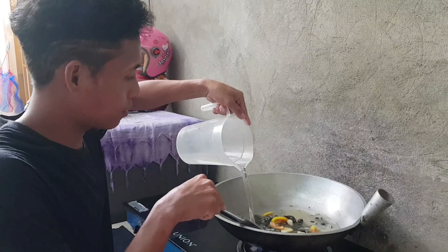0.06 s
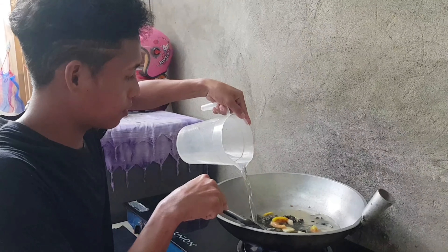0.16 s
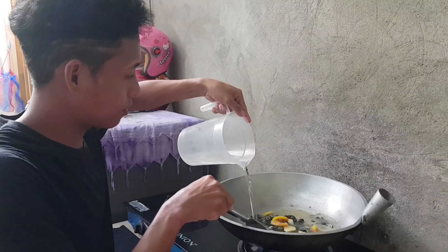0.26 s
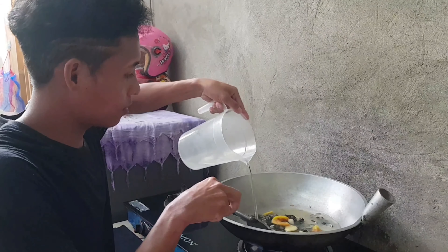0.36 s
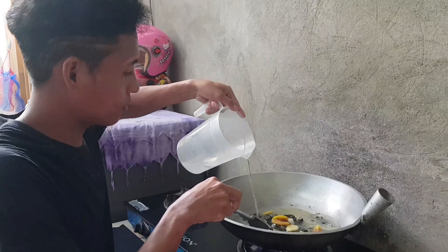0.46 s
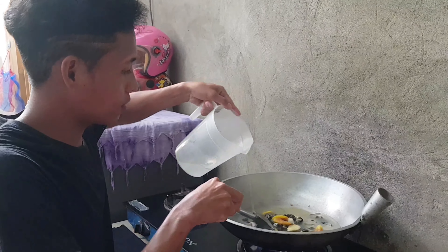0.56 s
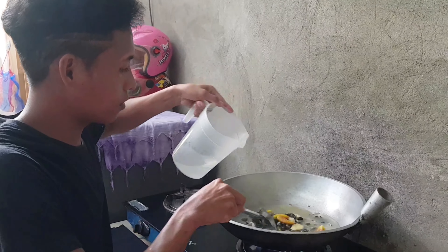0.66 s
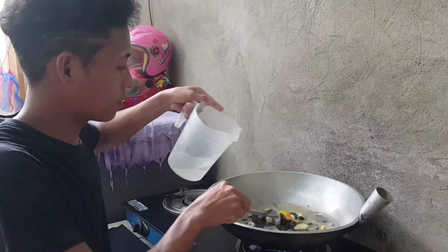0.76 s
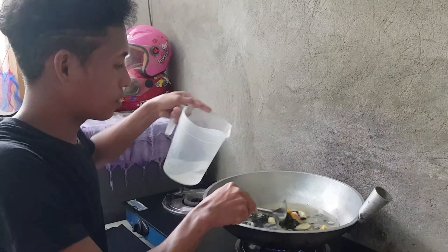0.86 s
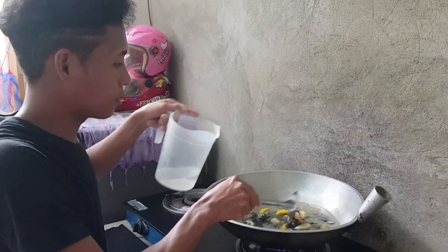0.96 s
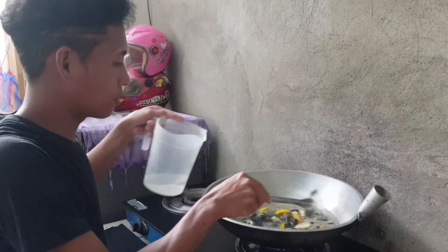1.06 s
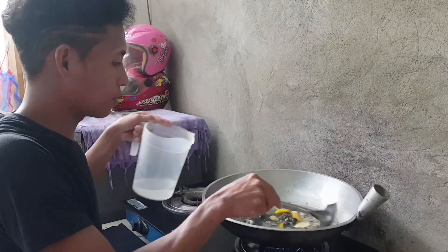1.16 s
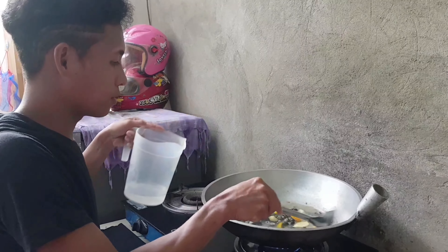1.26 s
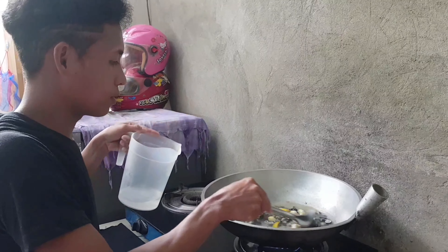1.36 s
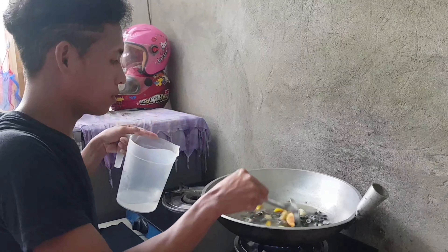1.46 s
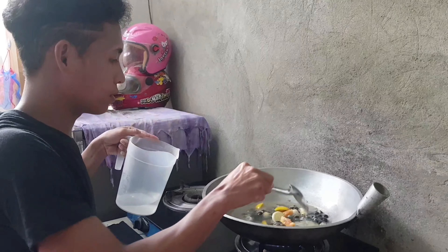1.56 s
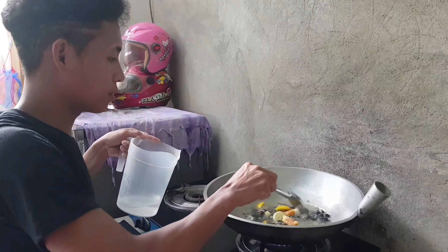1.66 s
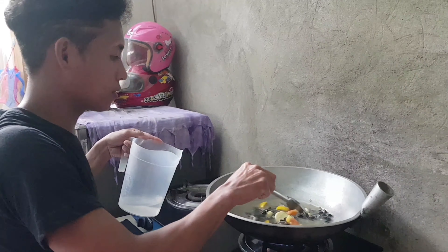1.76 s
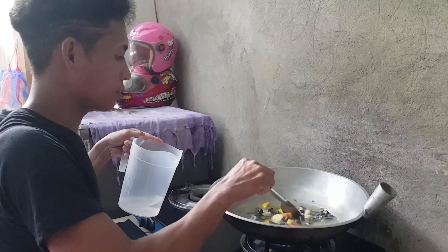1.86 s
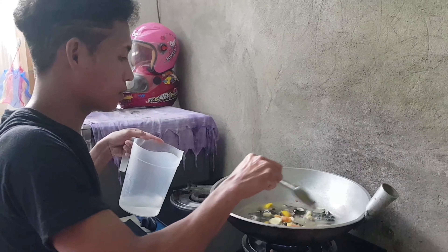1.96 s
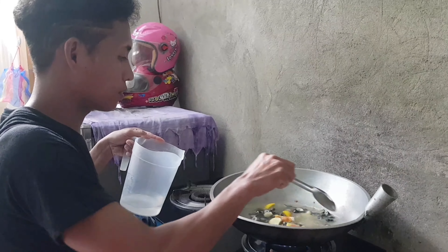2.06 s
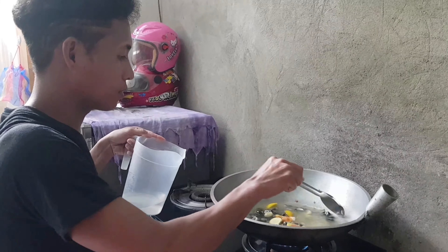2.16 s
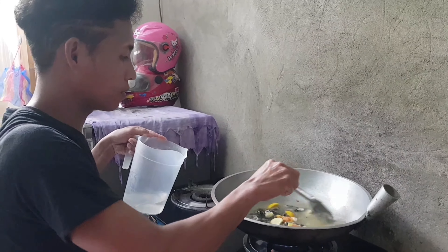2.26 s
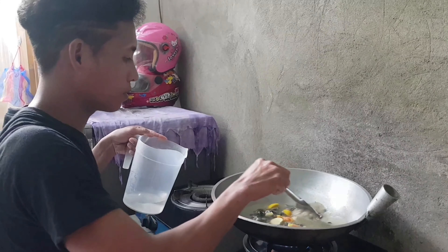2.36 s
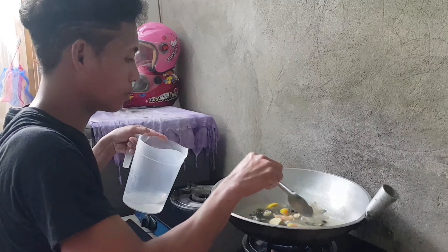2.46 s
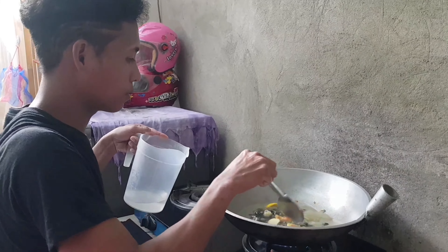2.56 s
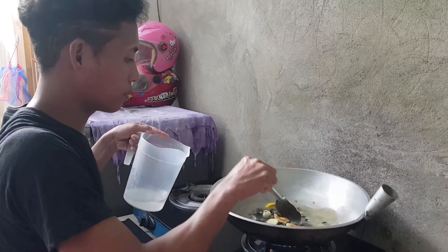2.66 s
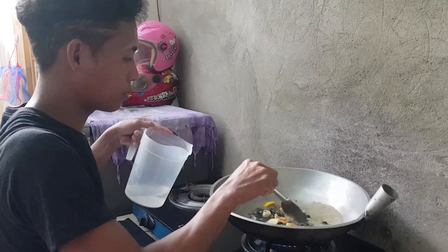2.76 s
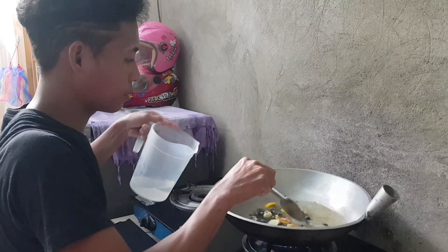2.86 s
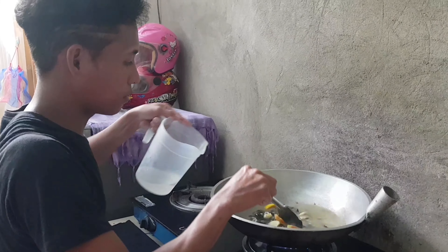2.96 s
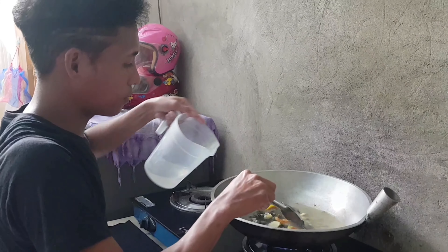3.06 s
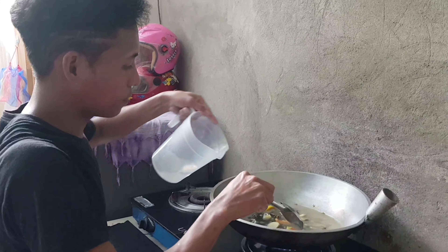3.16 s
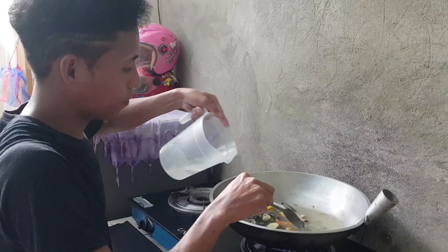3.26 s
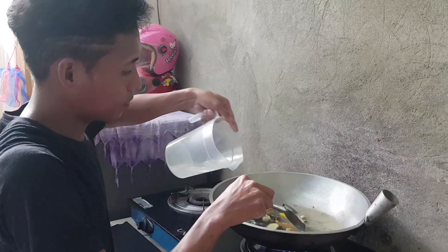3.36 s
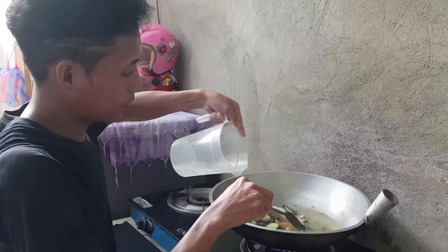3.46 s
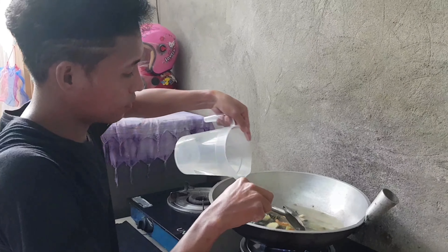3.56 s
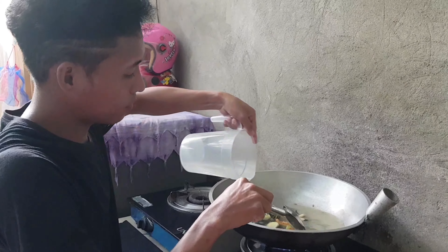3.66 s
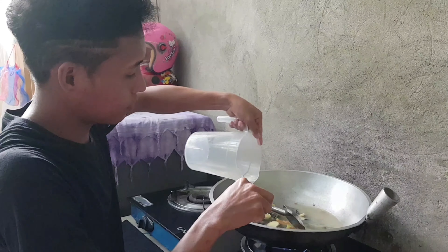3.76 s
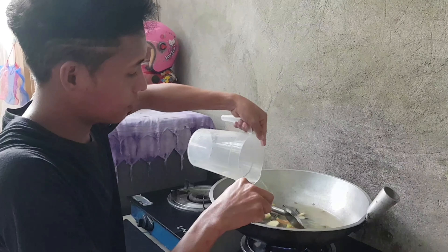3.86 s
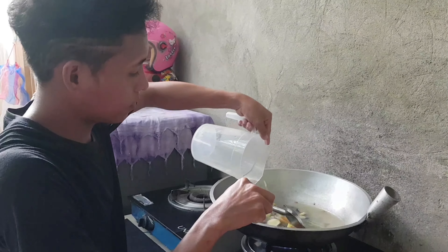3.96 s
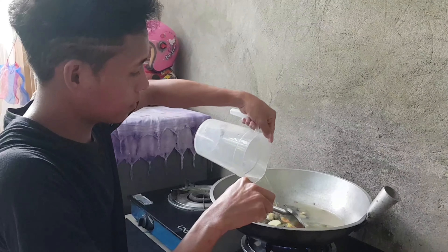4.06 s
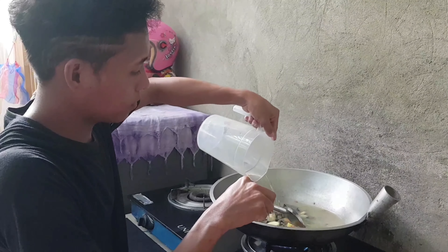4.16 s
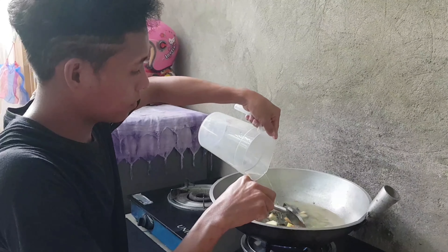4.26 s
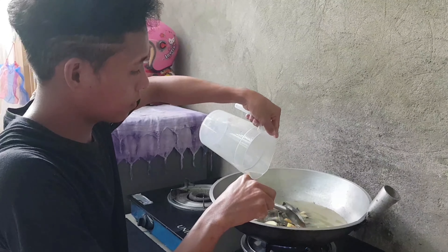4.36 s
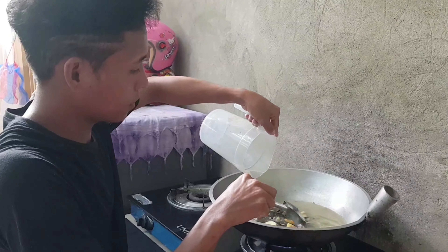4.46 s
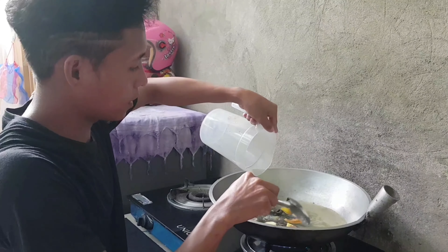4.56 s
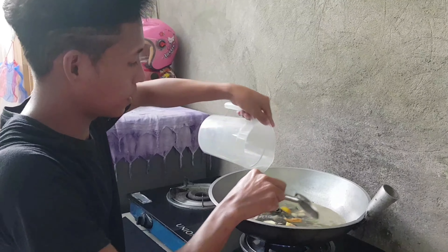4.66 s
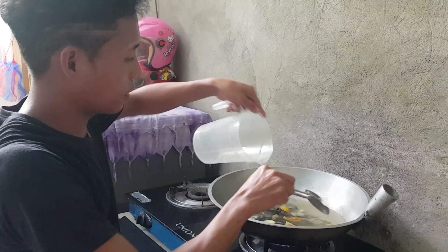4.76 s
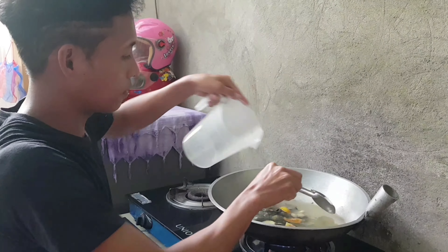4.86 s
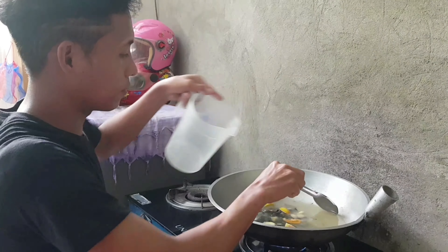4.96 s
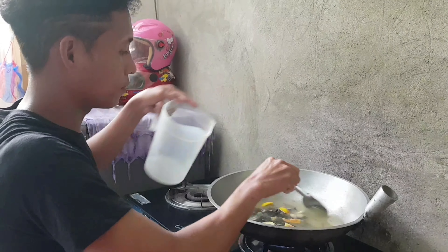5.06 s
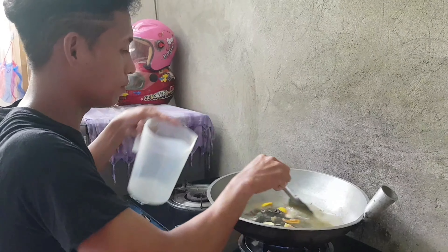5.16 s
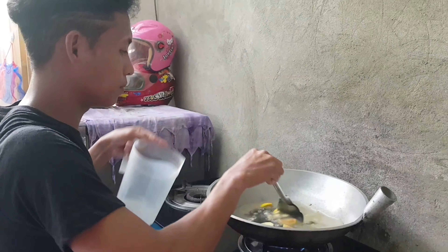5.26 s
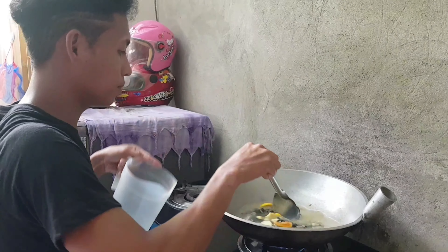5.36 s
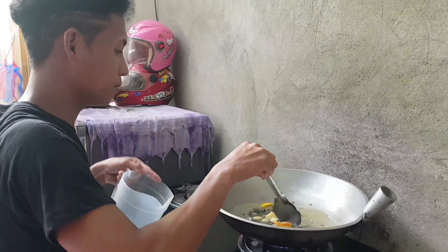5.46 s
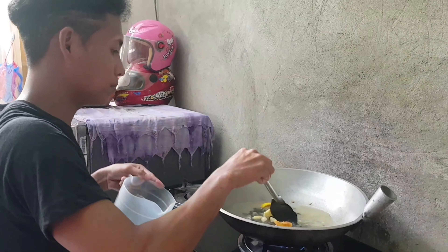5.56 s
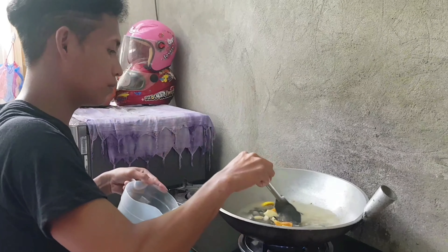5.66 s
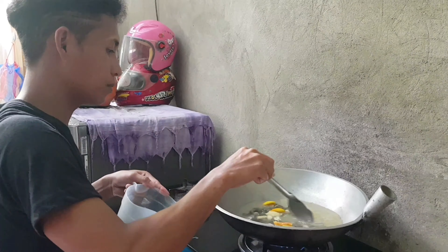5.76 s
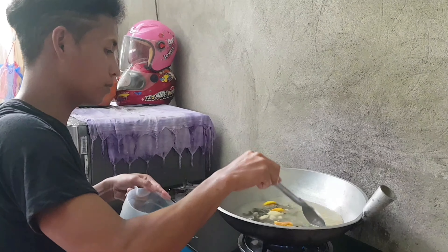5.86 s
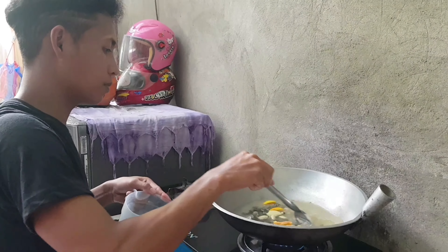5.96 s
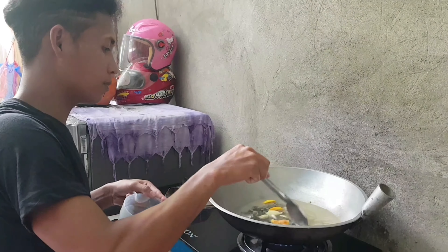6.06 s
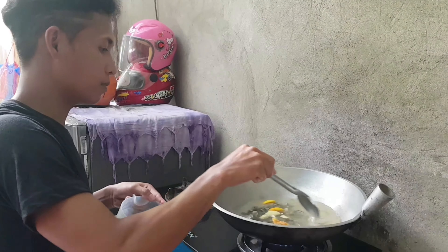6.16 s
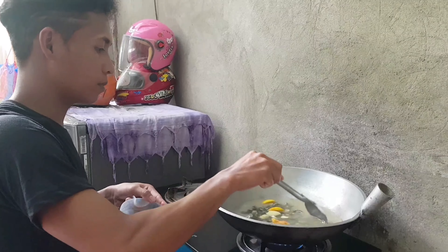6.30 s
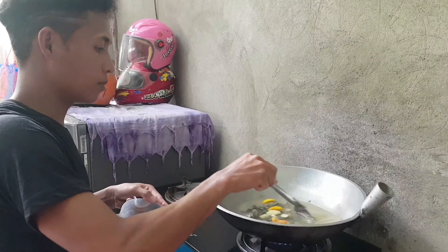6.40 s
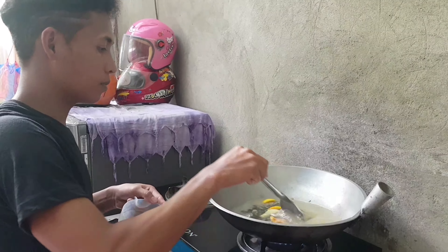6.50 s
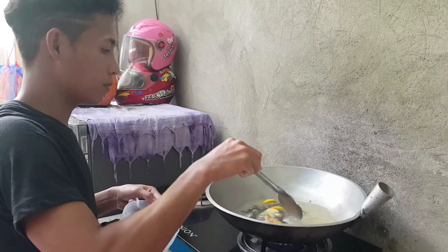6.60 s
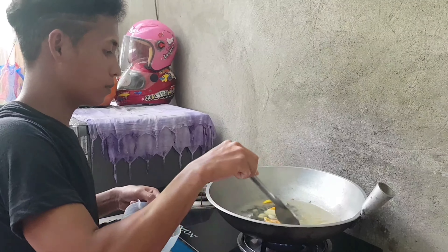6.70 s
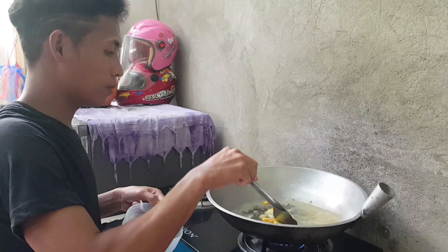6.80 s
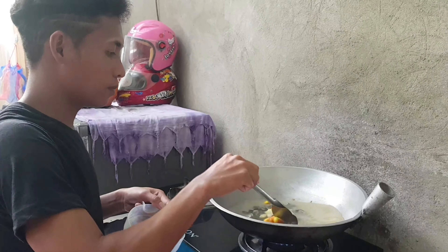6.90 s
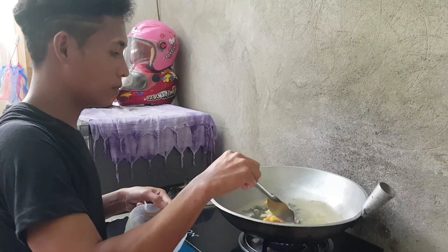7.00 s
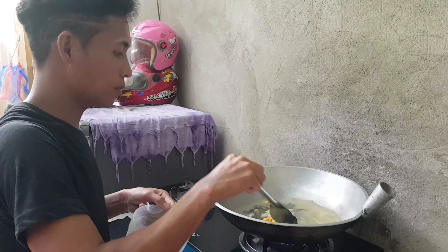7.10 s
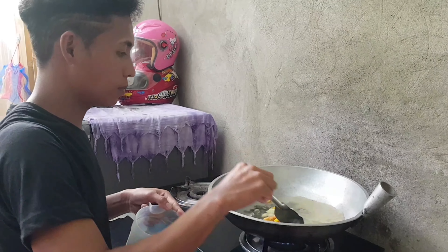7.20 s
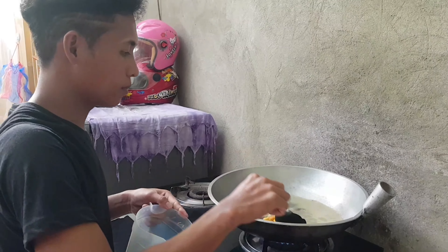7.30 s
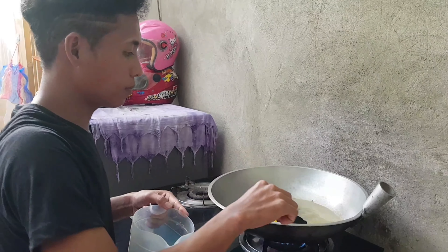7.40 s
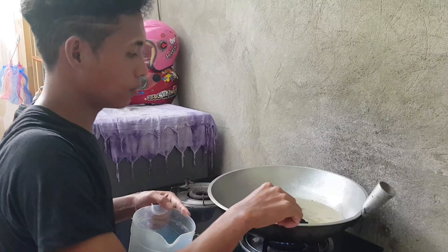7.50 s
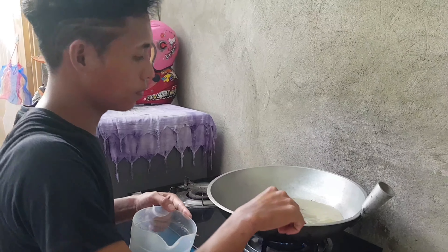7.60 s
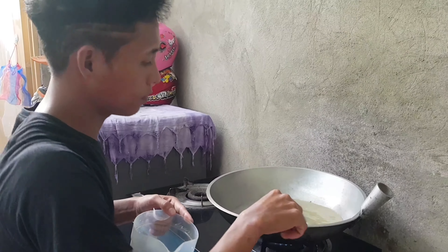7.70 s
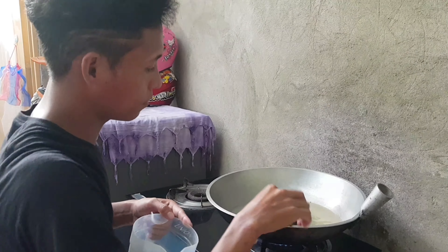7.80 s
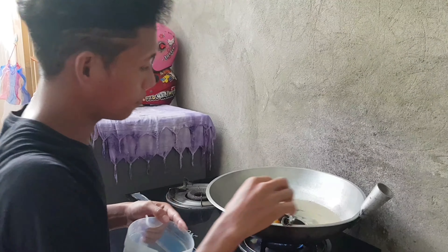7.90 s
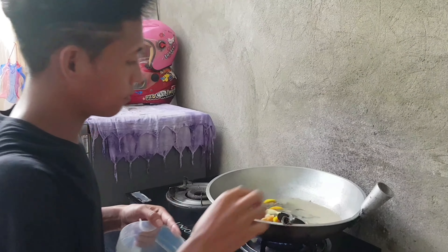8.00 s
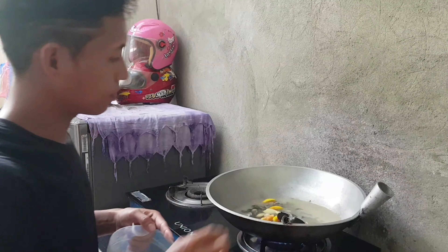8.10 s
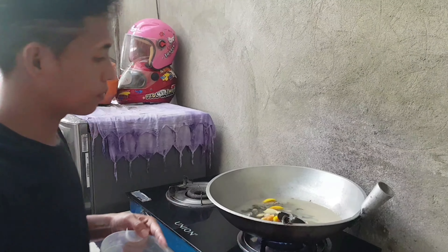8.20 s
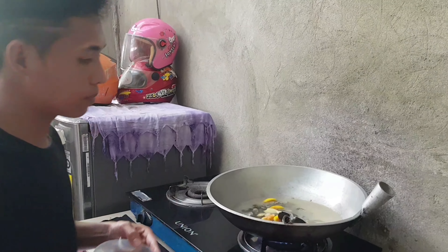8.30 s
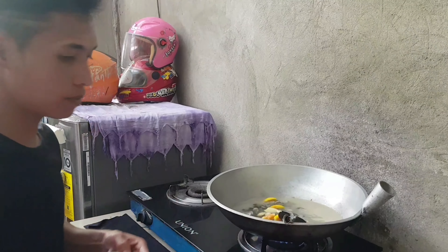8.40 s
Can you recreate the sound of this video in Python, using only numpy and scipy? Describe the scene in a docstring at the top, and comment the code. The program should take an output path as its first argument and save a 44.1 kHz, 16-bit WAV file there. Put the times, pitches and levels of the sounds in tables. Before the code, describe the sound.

Close-up cooking: steel blade scraping a ringing pan, shells rattling and ticking, bursts of watery hiss and bubbling, faint hum behind.

```python
"""A small hard-walled kitchen, a microphone pair near the wok, with mains hum and low passing tones behind it.
From the start a metal spatula scrapes in strokes, clinks on shellfish and jostles the loose shells.
Poured water hisses in waves, strongest at the start and near 1.2 s; from 0.26 s on it sloshes in bubbles.
After two seconds the blade knocks the pan and the bowl rings; dull handling bumps follow between 3 and 4 s.
Sounds are noise bursts, dying modes and bubbles; room reflections and a brief limiter finish the scene."""
import sys
import numpy as np
from scipy import signal
from scipy.fft import rfft, irfft
from scipy.io import wavfile
from scipy.ndimage import uniform_filter1d

SR = 44100
rng = np.random.default_rng(int(sys.argv[2]) if len(sys.argv) > 2 else 0)


def digitize_waveform(pressure):
    """Quantize a signal to 16-bit integers and store it at the path in sys.argv[1].

    Rows of a 2-D input are taken as channels; values are limited to [-1, 1].
    """
    field = np.atleast_2d(pressure).T
    bounded = np.clip(field, -1, 1)
    quanta = np.round(bounded * 32767).astype(np.int16)
    wavfile.write(sys.argv[1], SR, quanta)


N = 372204
TIME = np.arange(N) / SR
# strokes of the blade, edge and bowl levels relative to the grit, before the offsets of each sound:
# start_s, rise_s, hold_s, release_s, grit_db, body_db, edge_db, bowl_db
STROKES = [(0, 0.0033, 0.33, 0.17, -48.5, -5.5, -33, -4.5), (0.281, 0.14, 0.037, 0.38, -38.5, -4.5, 0, -21),
           (0.568, 0.28, 0.12, 0.22, -35.5, 0.5, -10.5, 0.5), (1.02, 0.017, 0.013, 0.22, -44, -20, 7, -7),
           (1.305, 0.099, 0.044, 0.4, -25.5, -10.5, -2.5, -12),
           (1.775, 0.09, 0.083, 0.66, -33, -11, -0.5, -15),
           (2.318, 0.013, 0.083, 0.033, -31.5, 2, -5, -3.5),
           (2.432, 0.023, 0.058, 0.18, -34.5, -12.5, -2, -5.5), (2.694, .02, 0.064, 0.17, -25, -3.5, -2, 5),
           (3.018, 0.031, 0.017, .045, -33, -9, -1, 7), (3.729, 0.027, 0.028, .08, -60, 0, 10.5, -8),
           (4.051, 0.0044, .38, 0.82, -38.5, -9, -8, -19), (5.091, 0.072, 0.039, .04, -36, 6, -7, -9),
           (5.193, 0.035, 0.045, 0.43, -24, -9, -1, -9), (5.338, 0.072, 0.015, 0.051, -33.5, -23, 3.5, -4),
           (5.565, 0.075, 0.037, 0.067, -25, -18, 2.5, -1),
           (5.997, 0.0085, 0.03, 0.14, -26.5, -7, 5.5, -18), (6.44, 0.022, 0.0096, 0.049, -24, -3.5, 4, -3),
           (6.493, 0.026, 0.066, .06, -27.5, -28, 4, -8), (7.339, 0.011, 0.021, 0.13, -37, -1, 5.5, -22),
           (7.381, 0.085, 0.033, 0.59, -47.5, 2.5, 4.5, 18.5)]
# modes of the wok, before the random spread: pitch_hz, energy_db, t60_s
WOK_MODES = [(450, -15, .14), (527, 9, .15), (535, 14, 0.3), (555.7, 7, 0.32), (725, 6.5, 0.21),
             (990, -9, 0.063), (1330, -15, .12), (1900, -20, 0.086), (2230, -21, .14), (3080, -19, 0.057),
             (3650, -23, .088), (3630, -7, 0.083)]
# modes of the blade, before the random spread: pitch_hz, energy_db, t60_s
BLADE_MODES = [(3595, 11, 0.08), (5600, 2, 0.082), (5617, 11.5, 0.018), (6240, -3.5, 0.048),
               (7100, -28, 0.18), (8120, -8, 0.052), (9900, 1, 0.06), (12060, -8, 0.2), (11900, -25, .1),
               (12400, -38, .091), (13400, -40, .08)]
# how alike the two microphones hear the scene: frequency_hz, likeness (0 to 1)
LIKENESS = [(60, 0.91), (300, 0.88), (640, 0.78), (1400, 0.25), (3000, 0)]


def gain_of(db):
    """Decibels to amplitude."""
    return 10 ** (np.asarray(db) / 20)


def evened(x):
    """Scales to rms 1."""
    return x / np.sqrt(np.mean(x ** 2) + 1e-20)


def unit(x):
    """Scales to a mean energy of 1 per channel."""
    return evened(x) / np.sqrt(x.shape[-1])


def read(points, hz):
    """Reads a table on a log-frequency axis."""
    f, value = np.transpose(points)
    return np.interp(np.log(hz + 1), np.log(f + 1), value)


def add(mix, s, sound):
    """Mixes a sound in at time s."""
    part = mix[..., max(round(s * SR), 0):][..., :sound.shape[-1]]
    part += sound[..., :part.shape[-1]]


def convolve(x, response):
    """Passes x through a response, keeping its length."""
    return signal.oaconvolve(np.atleast_2d(x), np.atleast_2d(response), axes=1)[:, :x.shape[-1]]


def colour(x, points, size=2048):
    """Causal, minimum-phase filter with the given spectrum."""
    hz = abs(np.fft.fftfreq(size, 1 / SR))
    log_gain = np.log(gain_of(read(points, hz)))
    spectrum = np.exp(np.conj(signal.hilbert(log_gain)))
    return convolve(x, np.fft.ifft(spectrum).real[:size // 2])


def likeness_angle(hz):
    """Phase between two microphones that gives a tone the likeness of its frequency."""
    return np.arccos(np.clip(read(LIKENESS, hz), -1, 1))


def ports(pair):
    """Two unrelated signals become a microphone pair, alike in the bass."""
    size = pair.shape[1]
    middle, side = rfft(pair)
    angle = likeness_angle(np.fft.rfftfreq(size, 1 / SR)) / 2
    left_right = np.array([[1], [-1]])
    return irfft(np.cos(angle) * middle + left_right * np.sin(angle) * side, size)


def wander(rate_hz):
    """Slow random motion of rms 1."""
    knots = np.arange(0, TIME[-1] + 1, .5 / rate_hz)
    return evened(np.interp(TIME, knots, rng.standard_normal(8192)[:len(knots)]))


def ring(modes, spread_db, detune, size=16384):
    """Dying modes whose strength and pitch vary at random from touch to touch; the sum has energy 1."""
    t = np.arange(size) / SR
    out = np.zeros((2, size))
    for hz, db, t60 in modes:
        phase = np.array([[.5], [-.5]]) * likeness_angle(hz) * rng.choice([-1, 1])
        pitch = hz * (1 + detune * (2 * rng.random() - 1))
        mode = np.sin(2 * np.pi * pitch * t + phase) * np.exp(-np.log(1000) * t / t60)
        out += gain_of(db + spread_db * (2 * rng.random() - 1)) * unit(mode)
    return unit(out)


def registers(x):
    """Splits a response into pan body, grit and sharp edge, each of energy 1."""
    bands = [(1400, "lowpass"), ([1400, 7000], "bandpass"), (7000, "highpass")]  # Hz
    filters = [signal.butter(4, hz, kind, fs=SR, output="sos") for hz, kind in bands]
    return [unit(signal.sosfilt(sos, x)) for sos in filters]


def contact(rise_s, fade_s, size=4096):
    """One touch of steel: dense coloured noise that dies in milliseconds."""
    # spectrum of the touch before scaling: frequency_hz, level_db
    touch_spectrum = [(150, -30), (300, -2.5), (430, -10), (560, 4), (800, 0), (1150, 0), (1500, -4),
                      (1900, 2.5), (2700, 2.5), (3600, 4.5), (4700, 1), (6200, -3.5), (7300, -7),
                      (14000, -7.5)]
    t = np.arange(size) / SR
    burst = rng.standard_normal((2, size)) * (1 - np.exp(-t / rise_s)) * np.exp(-t / fade_s)
    return unit(colour(ports(burst), touch_spectrum))


def push(rise_s, hold_s, release_s):
    """Gain of one push of blade or water: it swells, holds while easing a little, and dies away."""
    corners = np.cumsum([0, rise_s, hold_s, release_s])
    levels_db = [-11, 0, -3, -42.5]  # against the top
    return gain_of(np.interp(np.arange(0, corners[-1], 1 / SR), corners, levels_db))


def background(air_db=-52.5, rumble_db=-48, rumble_db_per_s=-0.8, swell_db=0.1, tone_waver_db=2):
    """Steady air, slowly receding street rumble, wavering mains hum and low tones that swell and fade."""
    # air and street spectrum before scaling: frequency_hz, level_db
    air_spectrum = [(18, -6), (30, -12), (50, 2.5), (80, -3.5), (115, 4), (250, -4), (400, -9.5),
                    (700, -25), (1250, -16), (4000, -26), (6500, -18.5), (7800, -32.5), (14000, -23)]
    # mains hum: pitch_hz, level_db, waver_db
    hum_tones = [(59, -67, 1.5), (119.9, -55, 0.5)]
    # low tones that swell and fade: swells of mains hum near 61 Hz, and others, perhaps far engines:
    # start_s, length_s, pitch_hz, glide_hz_per_s, level_db
    swelling_tones = [(.2, 1.7, 61, -1, -47), (1.546, 0.42, 299, 5.5, -55.5), (3.2, 0.36, 163, -13.5, -52),
                      (3.553, 0.65, 264.5, -23, -54.5), (4.659, 0.33, 253, -48, -49.5),
                      (6.179, 0.42, 60.2, -2, -53)]
    air = evened(colour(ports(rng.standard_normal((2, N))), air_spectrum, size=8192))
    low = signal.sosfiltfilt(signal.butter(2, 400, fs=SR, output="sos"), air)
    street_db = rumble_db + rumble_db_per_s * TIME + swell_db * wander(4.3)
    out = gain_of(air_db) * (air - low) + low * gain_of(street_db)
    for hz, db, waver_db in hum_tones:
        tone = np.sqrt(2) * np.sin(2 * np.pi * hz * TIME + 0.27 * wander(4.0))
        out += tone * gain_of(db + waver_db * wander(8.7))
    for s, length, hz, glide, db in swelling_tones:
        t = np.arange(0, length, 1 / SR)
        tone = np.sqrt(2) * np.sin(2 * np.pi * np.cumsum(hz + glide * t) / SR)
        swell = np.sin(np.pi * t / length)
        add(out, s, tone * swell * gain_of(db + tone_waver_db * wander(22)[:len(t)]))
    return out


def sizzle(pops_per_s=6000):
    """Tiny steam bubbles of all sizes burst where water meets hot metal: random clicks, coloured."""
    # hiss spectrum before scaling: frequency_hz, level_db
    hiss_spectrum = [(500, -4), (1500, 5.5), (5500, 0.5), (8000, -1.5), (12000, 0), (15000, -10)]
    # the hiss comes in waves, strongest at the start and near 1.2 s, fainter later: time_s, level_db
    hiss_levels = [(0, -45), (.5, -63), (1.2, -44), (1.7, -63), (2.25, -51), (3.3, -62), (4.3, -57.5),
                   (5.1, -57.5), (6.3, -55.5), (7.2, -62.5), (8.44, -62.5)]
    pops = rng.standard_normal((2, N)) * (rng.random((2, N)) < pops_per_s / SR)
    return evened(colour(pops, hiss_spectrum)) * gain_of(np.interp(TIME, *np.transpose(hiss_levels)))


def scrapes(slips_per_s=850, spread_db=1.5, judder_db=2.33, body_db=-4, grit_db=-3.0, edge_db=-2,
            bowl_db=-9, blade_db=-13, shell_db=-7, count=6, size=4096):
    """The blade sticks and slips over pan and shells, at several spots that each have their own note."""
    force = np.zeros((4, N))  # body, grit, edge, bowl
    for s, rise, hold, release, db, body, edge, bowl in STROKES:
        levels_db = db + np.array([body + body_db, grit_db, edge + edge_db, bowl + bowl_db])
        add(force, s, np.outer(gain_of(levels_db), push(rise, hold, release)))
    judder = evened(gain_of(judder_db * wander(70)))
    force = uniform_filter1d(force, 200, axis=1) * judder
    out, drive = np.zeros((2, N)), np.zeros(N)
    for shell_hz in np.geomspace(1900, 6300, count):
        sizes = gain_of(spread_db * np.minimum(rng.exponential(1, N), 2.5)) * rng.choice([-1, 1], N)
        moments = rng.random(N) < slips_per_s / count / SR
        shifting = gain_of(3.26 * wander(9))  # contact moves between the spots
        slips = evened(sizes * moments * shifting) / np.sqrt(count)
        spot = contact(rise_s=0.0004, fade_s=0.00058, size=size)
        spot += gain_of(blade_db) * ring(BLADE_MODES, spread_db=5, detune=.002, size=size)
        spot += gain_of(shell_db) * ring([(shell_hz, 0, .012)], spread_db=0, detune=0.0093, size=size)
        for level, response in zip(force, registers(spot)):
            out += convolve(slips * level, response)
        drive += slips
    return out + convolve(drive * force[3], ring(WOK_MODES, spread_db=-4, detune=0.0017))


def jostle(level_db=2, follow=0.43, ticks_per_s=20, luck_db=6, tick_db=-4, t60_s=0.03, count=10):
    """Loose shells tap each other during the strokes, a little louder under a harder stroke."""
    taps = np.zeros((count, N))
    for s, rise, hold, release, db, *_ in STROKES:
        shape = push(rise, hold, release)
        for k, (when, shell, luck) in enumerate(rng.random((40, 3))):
            at = int((k + when) / ticks_per_s * SR)
            if at < len(shape):
                strength = gain_of(level_db + follow * db + luck_db * luck)
                add(taps[int(shell * count)], s + at / SR, strength * shape[at:at + 1])
    out = np.zeros((2, N))
    # notes from the largest to the smallest shell, Hz
    for train, hz in zip(taps, np.geomspace(1310, 3950, count)):
        tick = registers(contact(rise_s=0.0014, fade_s=0.0099))[1]
        note = ring([(hz, 0, t60_s)], spread_db=0, detune=0.037, size=4096)
        out += convolve(train, gain_of(tick_db) * tick + note)
    return out


def clinks(level_db=18, body_db=4, edge_db=5, shell_db=-3, chatter_s=0.0078, chatter_growth=0.37):
    """A tick that chatters longer the harder it lands, the short note of the shell and the blade's ring."""
    # blade meets shell or pan, body, edge and blade relative to the hit, before the offsets above:
    # start_s, hit_db, body_db, edge_db, shell_hz, blade_db
    hits = [(.021, -33.5, -10, -23, 1360, -9), (.0837, -34, -8, -27, 1450, -23),
            (.373, -42, -21, 17.5, 6000, -11), (0.5907, -28, -9, -18, 3540, -17),
            (0.6773, -31, -23, -25, 1870, -15), (.8066, -27, -6, -16, 1880, -17),
            (0.8989, -29, -17, 7, 1920, -17), (.9976, -30, -27, -11, 3700, -13),
            (1.2966, -27.5, -16, -6, 5400, -21), (1.3399, -20, -23, -3, 5580, 0),
            (1.3819, -17.5, -24, 0, 3560, -11), (1.4005, -19.5, -30, -4, 3060, -16),
            (1.4545, -21.5, -10, 2, 4700, 3.5), (1.5207, -20.5, -12.5, -16, 5300, -2),
            (1.6757, -22, -15.5, -5, 5900, -8.5), (1.7684, -23, -24, -17, 5700, -1.5),
            (1.7868, -23, -12, -23, 1380, -22), (1.8253, -27, -22, -5, 3340, -12),
            (1.9116, -26.5, -11, -17, 3500, -4), (1.9386, -25, -16, -12, 3800, -5),
            (2.3117, -19, -15, -11, 6300, -10), (2.3756, -20.5, -12, -7, 3380, 2),
            (2.443, -24.5, -20, 1, 3520, 3.5), (2.6283, -30, -12.5, -21, 5220, -5),
            (2.6874, -17.5, -24, 7, 5500, 3), (2.7145, -17.5, -8, -15, 3840, -6),
            (2.7465, -18.5, -27, -16, 5300, 6), (2.7515, -18, -28, -6, 5440, -7),
            (3.0156, -18.5, -28, -4, 3610, -18), (3.0488, -24.5, -9.5, -8, 3180, -15),
            (4.221, -30, -18, -10, 4160, -7), (4.2422, -23, -26, -14, 6200, -2),
            (4.157, -30, -26, -10, 4300, -16), (4.3354, -23, -33, -33, 2040, -19),
            (4.3615, -29.5, -27, -25, 4170, 2.5), (4.4092, -38, -18, -4, 2970, -1),
            (4.4427, -27.5, -17, -40, 1970, -24), (4.5459, -23.5, -24, -10.5, 4880, -7),
            (5.0755, -17.5, -0.5, -3.5, 3250, -1.5), (5.1986, -16, -32, -6, 5860, 0.5),
            (5.236, -18, -16, -7, 1330, -14), (5.2793, -31, 0, 8, 1320, -11),
            (4.9077, -50.5, -6, 6, 6040, -22), (5.5149, -24.5, -28, -11, 3700, -20),
            (5.5383, -22.5, -18, -12, 5720, 1), (5.578, -16, -30, -1.5, 5400, -4),
            (5.6325, -12, -6.5, -3, 5750, -4), (5.973, -16.5, -26, -1, 1910, -16),
            (6.006, -14, -15, -23, 1930, -16), (6.032, -26, -18, -12, 3470, 12),
            (6.203, -40, -25, 3, 5640, -9), (6.3969, -24, -40, -2.5, 6200, 3.5),
            (6.4209, -19, -43, -1, 3580, -7), (6.459, -13.5, -11.5, -21, 1850, -3),
            (6.57, -23.5, -18, 4, 3360, -12), (6.7845, -8.5, -18.5, 1, 5720, -14),
            (6.9502, -26, -13, -28, 4000, -20), (7.214, -45.5, -21, -6, 4300, -3),
            (7.3477, -24, -20, 1, 5020, -9), (7.3661, -18.5, -11.5, -26, 1950, -24),
            (7.5957, -37, -9, -30, 4300, -3), (7.703, -16.5, -18.5, -21, 3950, -10),
            (8.107, -39.5, -24, -33, 2540, -11)]
    out = np.zeros((2, N))
    for s, db, body, edge, hz, blade_db in hits:
        fade_s = chatter_s * gain_of(chatter_growth * (db + 20.5))
        low, grit, top = registers(contact(rise_s=0.00028, fade_s=fade_s))
        size = gain_of(db + level_db)
        shell = ring([(hz, 0, .018)], spread_db=0, detune=0, size=4096)
        blade = ring(BLADE_MODES, spread_db=4, detune=.001, size=8192)
        add(out, s, size * (gain_of(body + body_db) * low + grit + gain_of(edge + edge_db) * top))
        add(out, s, size * gain_of(shell_db) * shell)
        add(out, s, size * gain_of(blade_db) * blade)
    return out


def slosh(bubbles_per_s=1800, cycles=8, rise=0.027, size=1536):
    """Swirling water traps air in a crowd of short bubbles, each rising a little in pitch."""
    # water pushed about in the pan, level before the crowd's scaling:
    # start_s, rise_s, hold_s, release_s, level_db, main_hz, glide_hz_per_s
    swirls = [(0.258, 0.17, .1, .16, -40.5, 675, 100), (0.561, .16, .08, .22, -33.5, 686, 143),
              (4.625, .045, .025, .12, -38, 976, -1400), (5.091, 0.019, 0.2, 0.042, -43.5, 870, -300)]
    # pockets of air that it closes: multiple (of main_hz), spread (share), relative_db
    pockets = [(.74, 0.163, -3), (1, 0.09, 1.5), (1.15, 0.193, -3.5), (1.75, 0.22, -15), (2.85, .14, -1.5)]
    t, crowd = np.arange(size) / SR, np.zeros((2, N))
    for s, rise_s, hold_s, release_s, db, main_hz, glide in swirls:
        shape = push(rise_s, hold_s, release_s)
        draws = rng.random((3000, 4))[:int(bubbles_per_s * len(shape) / SR)]
        for when, kind, offset, side in draws:
            at = int(when * len(shape))
            multiple, spread, kind_db = pockets[int(kind * len(pockets))]
            pitch = (main_hz + glide * at / SR) * multiple * (1 + spread * (2 * offset - 1))
            turns = pitch * t
            phase = np.array([[1], [-1]]) * (2 * side - 1) * likeness_angle(pitch)
            rising_turns = turns * (1 + rise * np.tanh(turns / cycles / 2))
            envelope = turns * np.exp(-2 * turns / cycles)
            bubble = np.sin(2 * np.pi * rising_turns + phase) * envelope
            add(crowd, s + at / SR, shape[at] * gain_of(db + kind_db) * unit(bubble))
    return np.sqrt(SR / bubbles_per_s) * crowd


def knocks(level_db=21.0):
    """The blade presses home and the whole bowl rings in its modes, a little differently each time."""
    # knocks, before level_db is added: start_s, knock_db
    presses = [(2.376, -31.5), (2.717, -48), (2.751, -17), (3.051, -42), (5.077, -29), (5.682, -19),
               (6.457, -46), (7.439, -43), (7.499, -34)]
    out = np.zeros((2, N))
    for s, db in presses:
        add(out, s, gain_of(db + level_db) * ring(WOK_MODES, spread_db=2, detune=.008))
    return out


def bumps(level_db=19, fade_s=0.035, size=8192):
    """Dull handling bumps: soft, low, fading noise with no ring."""
    # bumps, before level_db is added: start_s, bump_db, deep_bass_db (relative)
    thumps = [(3.288, -31.5, 13), (3.429, -29, 5.5), (3.957, -25, -3), (3.978, -27.5, -3)]
    # thud spectrum before scaling: frequency_hz, level_db
    thud_spectrum = [(25, -51), (55, 6.5), (100, -13), (180, -3.5), (300, -6.5), (420, -21.5), (1000, -19),
                     (4000, -32.5)]
    out = np.zeros((2, N))
    for s, db, bass_db in thumps:
        thud = ports(rng.standard_normal((2, size))) * np.exp(-np.arange(size) / SR / fade_s)
        thud = colour(colour(thud, thud_spectrum), [(70, bass_db), (180, 0.0041)])
        add(out, s, gain_of(db + level_db) * unit(thud))
    return out


def kitchen(x, near_db=-3, near_s=0.011, tail_db=-3.5, size=26000):
    """Quick reflections from the bowl and the wall behind it, then the tail of the bare room."""
    # decay of the room: frequency_hz, t60_s
    room_decay = [(150, 0.19), (600, 0.48), (2000, 0.43), (5000, 0.44), (9000, 0.4), (14000, 0.22)]
    t = np.arange(size) / SR
    taps = ports(rng.choice([-1., 1.], (2, size)) * (rng.random((2, size)) < 4000 / SR))
    near = unit(taps * np.exp(-t / near_s) * (t > .002))
    hz, at, z = signal.stft(ports(rng.standard_normal((2, size))), SR, nperseg=256)
    decay = np.exp(-np.log(1000) * at / read(room_decay, hz)[:, None])
    tail = signal.istft(z * decay, SR, nperseg=256)[1][:, :size]
    tail = unit(tail * (1 - np.exp(-t / 0.015)))
    wet = convolve(x, gain_of(near_db) * near + gain_of(tail_db) * tail)
    return (x + wet) / np.sqrt(1 + gain_of(near_db) ** 2 + gain_of(tail_db) ** 2)


def scene():
    """The wok in the kitchen, leaning left in the middle range and right in the treble, over the background."""
    # balance of the microphones: frequency_hz, left_minus_right_db
    balance = [(200, 0), (700, 1), (1300, 2.5), (2400, 3.5), (4400, -2.1), (14000, -2)]
    pan = kitchen(scrapes() + clinks() + jostle() + slosh() + sizzle() + bumps())
    # the knocked bowl's ring is heard nearly dry
    pan += kitchen(knocks(), near_db=-20, tail_db=-11)
    lean_db = read(balance, np.fft.rfftfreq(N, 1 / SR)) * np.array([[.5], [-.5]])
    return irfft(rfft(pan) * gain_of(lean_db), N) + background()


def record(dry, threshold_db=-23, share=0.39, recovery_db_per_s=45, edge_hz=14550):
    """A limiter ducks everything briefly around and after the loudest blows; then the band limit."""
    power_db = 10 * np.log10(abs(uniform_filter1d((dry ** 2).mean(0), 200)) + 1e-12)
    fall_db = TIME * recovery_db_per_s
    held_db = np.maximum.accumulate(power_db + fall_db) - fall_db
    over_db = np.maximum(held_db - threshold_db, 0)
    ducked = dry / gain_of(share * uniform_filter1d(over_db, size=100))
    band_limit = signal.firwin(255, edge_hz, window=("kaiser", 9), fs=SR)
    return signal.oaconvolve(ducked, band_limit[None], "same")


dry = scene()
out = record(dry)
digitize_waveform(out)
```